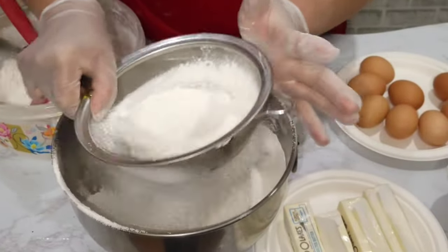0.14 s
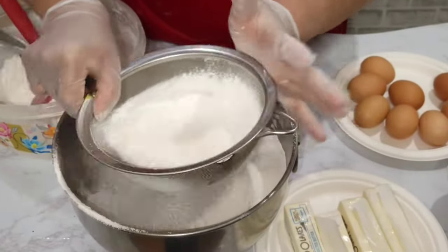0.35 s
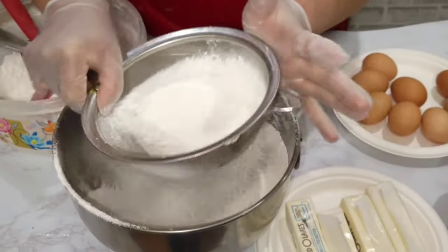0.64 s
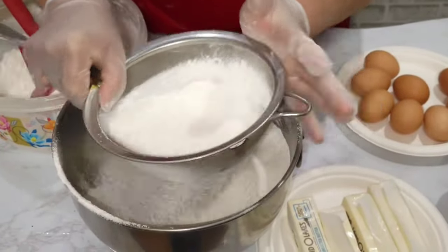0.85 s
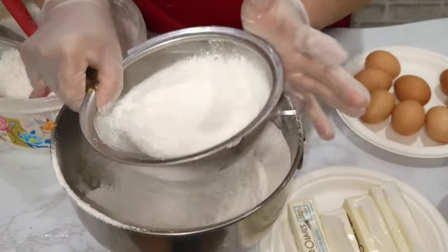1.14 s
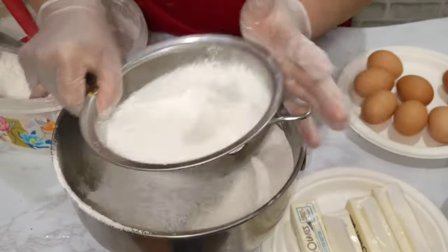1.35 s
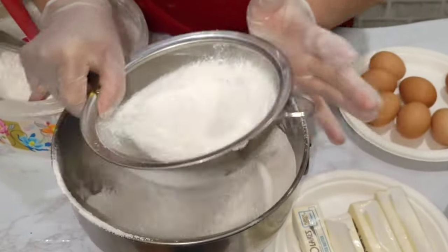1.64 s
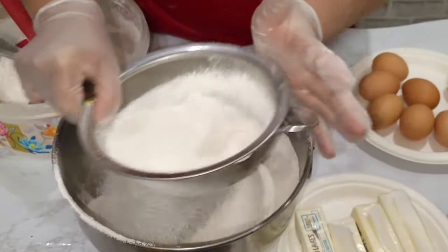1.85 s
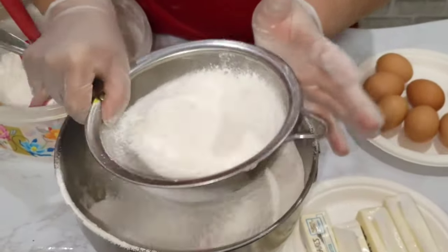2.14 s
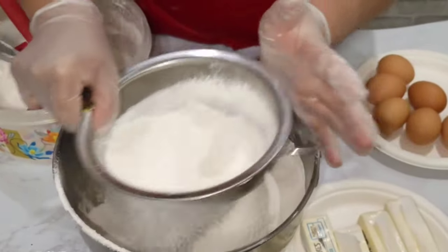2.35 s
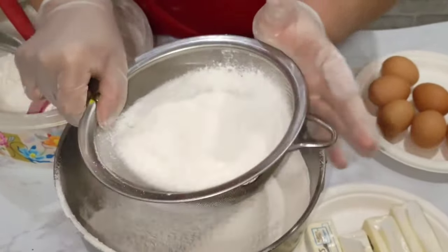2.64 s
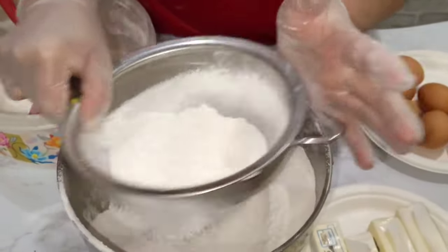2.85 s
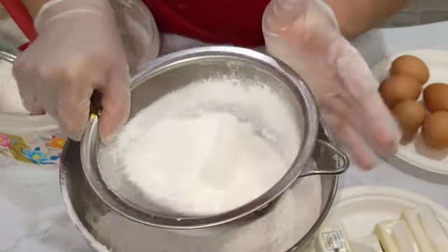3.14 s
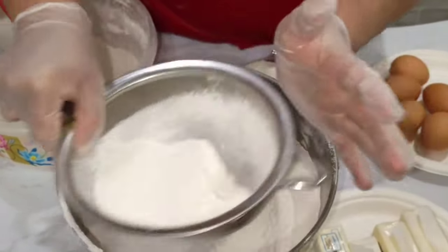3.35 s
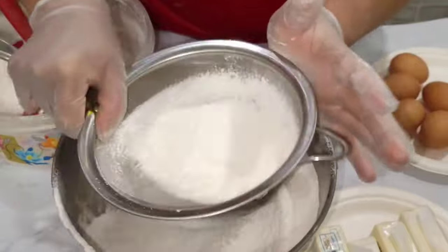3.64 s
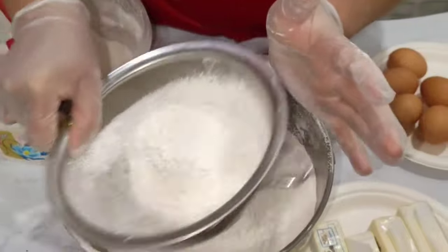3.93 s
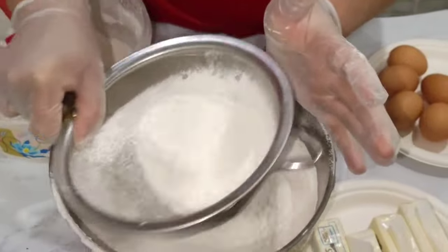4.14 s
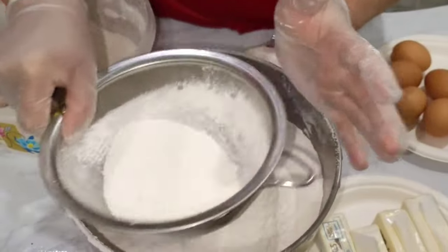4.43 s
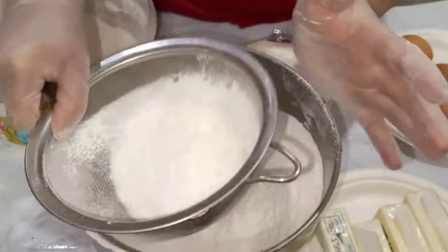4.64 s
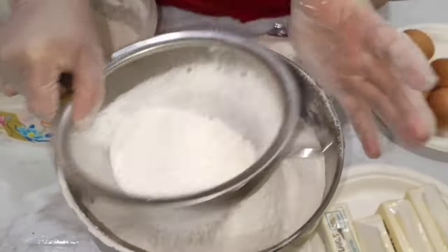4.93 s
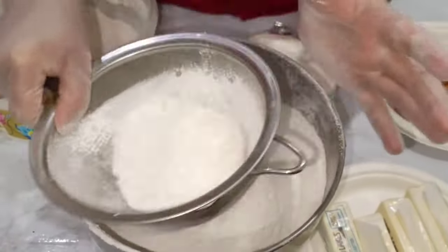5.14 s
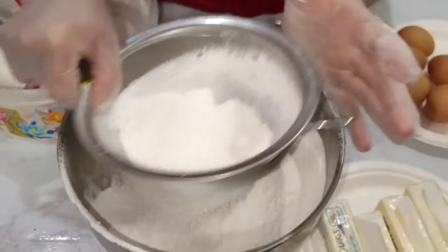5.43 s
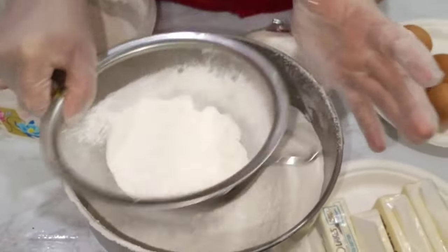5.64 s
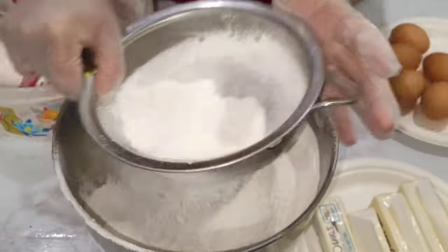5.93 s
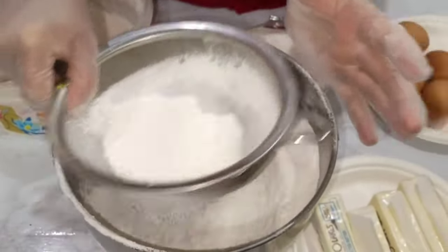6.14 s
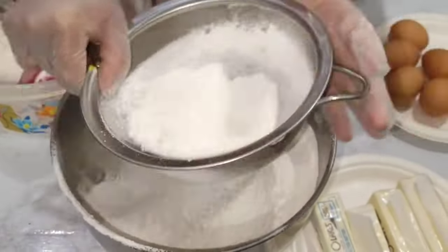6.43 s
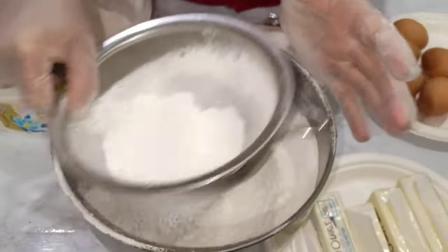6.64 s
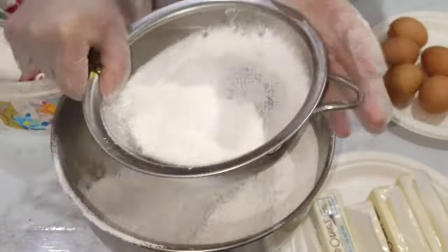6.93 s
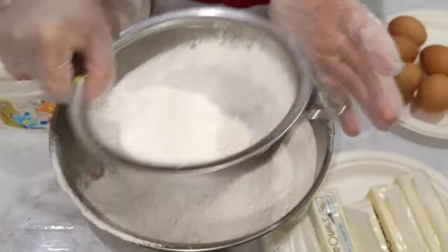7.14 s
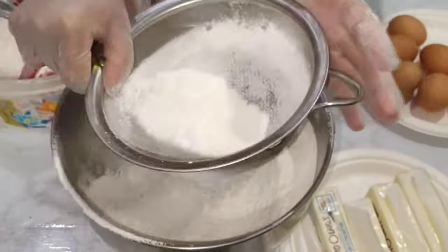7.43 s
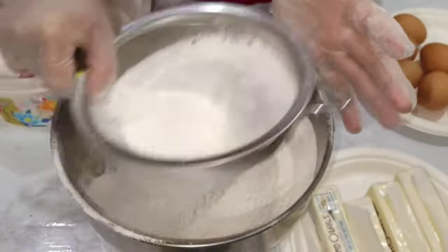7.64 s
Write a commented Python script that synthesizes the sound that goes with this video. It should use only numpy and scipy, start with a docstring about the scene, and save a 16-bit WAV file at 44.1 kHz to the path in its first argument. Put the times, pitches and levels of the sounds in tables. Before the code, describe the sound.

Close up in a small kitchen, a palm pats the rim of a wire sieve about four times a second. Each pat is a short dry mesh rattle with a faint dull thud, then a puff of hissing flour. From about four to six seconds the frame also strikes a steel bowl, with loud bright clinks ringing briefly. Then only the tapping continues, over faint low room rumble.

```python
"""Tapping a flour sieve over a steel bowl

A wire sieve of flour is tapped with the flat of a hand, about four times a second, in a kitchen.
Each tap is a burst of coloured noise for the rattling rim, plus damped modes and dull noise for the frame.
Swelling hiss is the flour hopping, landing and sliding on the mesh; small pitched knocks come from the grip.
For a while the sieve sinks so low that it clinks on the bowl: detuned steel modes, shimmer, buzz and crack.
The table bumps in slow low swells; rumble, air and a short noise tail make the room."""
import sys
import numpy as np
from scipy import signal
from scipy.fft import rfft, irfft, next_fast_len
from scipy.io import wavfile

SR = 44100
rng = np.random.default_rng(int(sys.argv[2]) if len(sys.argv) > 2 else 0)


def wav_record(signal):
    """Record a signal, one row per channel, as 16-bit PCM in the file named by sys.argv[1]."""
    frames = np.transpose(np.atleast_2d(signal))
    bounded = np.clip(frames, -1, 1)
    # unit amplitude maps onto the largest positive 16-bit level
    quanta = np.round(bounded * 32767).astype(np.int16)
    wavfile.write(sys.argv[1], SR, quanta)


N = 343098
CLOCK = np.arange(N) / SR   # time in the scene, s
AGE = np.arange(SR * 2 // 5) / SR   # time within one short sound (0.4 s), s

# Names ending in _t60 are times to fall by 60 dB, in s.
# Spectra are relative: the layers they colour are levelled afterwards.


def from_db(db):
    """Decibels to gain."""
    return 10 ** (np.asarray(db) / 20)


def at_hz(points, hz):
    """Read a table on a log-frequency axis."""
    f, value = np.transpose(points)
    return np.interp(np.log(np.maximum(hz, 1)), np.log(f), value)


def in_time(rows):
    """Draw a straight-line curve through the rows, one value per sample."""
    return np.interp(CLOCK, *np.transpose(rows))


def rms_one(x):
    """Scale to rms 1."""
    return x / np.sqrt(np.mean(x ** 2) + 1e-20)


def at_level(x, db):
    """Give a short sound the energy of 10 ms at this level."""
    return from_db(db) * rms_one(x) * np.sqrt(0.01 * SR / x.shape[-1])


def fade(t60):
    """Free exponential decay, 60 dB in t60."""
    return np.exp(-np.log(1000) * AGE / t60)


def swell(centre_s, width_s):
    """A bell-shaped rise and fall."""
    return np.exp(-0.5 * ((AGE - centre_s) / width_s) ** 2)


def ping(hz, t60):
    """One damped mode: a dying sine."""
    return np.sin(2 * np.pi * hz * AGE) * fade(t60)


def add(out, start_s, x):
    """Mix a short sound in at its start time, trimmed to the scene."""
    i = round(start_s * SR)
    first, last = max(i, 0), min(i + x.shape[-1], N)
    out[:, first:last] += x[..., first - i:last - i]


def colour(x, spectrum):
    """Causal (minimum-phase) filter with the given spectrum."""
    size = 2 * next_fast_len(x.shape[-1] // 2 + 1024)
    gain = from_db(at_hz(spectrum, np.fft.rfftfreq(size, 1 / SR)))
    # folding the cepstrum onto positive time makes the filter minimum-phase
    cepstrum = irfft(np.log(gain))
    cepstrum[1:size // 2] *= 2
    cepstrum[size // 2 + 1:] = 0
    response = np.exp(rfft(cepstrum))
    return irfft(rfft(x, size) * response)[..., :x.shape[-1]]


# stereo width of noise and bowl modes: f/Hz, side-to-mid level/dB
STEREO_WIDTH = [(60, -5.5), (110, -12), (200, -9), (380, -3), (700, -0.5), (1290, 1.5), (2380, -1.5),
                (4400, -0.5), (8120, -9.5), (15000, -8.5)]


def stereo_noise(size, width_db=0., grain_db=0.):
    """White noise, wide in the middle range; grain_db makes it a crowd of unequal clicks."""
    grains = from_db(grain_db * np.minimum(rng.exponential(1, size), 4))
    mid, side = rng.standard_normal((2, size)) * grains
    side = from_db(width_db) * colour(side, STEREO_WIDTH)
    return np.array([mid + side, mid - side])


def dying_noise(t60s, width_db):
    """Countless modes struck at once: each band dies at its own rate."""
    spectrum = rfft(stereo_noise(len(AGE), width_db))
    hz = np.fft.rfftfreq(len(AGE), 1 / SR)
    centres, times = np.transpose(t60s)
    shares = [at_hz(np.c_[centres, one], hz) for one in np.eye(len(centres))]   # overlapping bands
    return sum(irfft(spectrum * share, len(AGE)) * fade(t60) for share, t60 in zip(shares, times))


# low room rumble: f/Hz, level/dB per Hz
RUMBLE_SPECTRUM = [(20, -27), (40, -19), (56, 5), (75, -2), (110, -10.5), (200, -10.5), (400, -43)]
# air of the room: f/Hz, level/dB per Hz
AIR_SPECTRUM = [(20, -20), (100, -0.5), (200, 3.5), (450, -3.5), (900, -12), (1900, -13.5), (2500, -20),
                (3500, -14.5), (6500, -19), (10500, -16), (13000, -24), (16000, -16)]
# rustle of flour in the moving sieve, before the overall lift: t/s, level/dB
RUSTLE_LEVEL = [(0.0, -61.5), (0.54, -65), (0.65, -54), (1.47, -67), (3.12, -55), (3.75, -62),
                (3.99, -58.5), (4.4, -50), (4.83, -58), (5.72, -57.5), (6.24, -58), (7.78, -58)]
# sliding flour, for the rustle and the ticks of the grip: f/Hz, level/dB per Hz
SLIDING_SPECTRUM = [(300, -2), (750, 1), (1800, -1), (2450, -8.5), (3400, -4.5), (4900, -13.5), (6400, -10),
                    (9000, -20), (11300, -32), (13000, -9), (16000, -23)]


def background(rumble_db=-59.0, rustle_db=2.0, air_db=-57.0):
    """Steady noise for the room's rumble and air; grainy noise with a moving level for rustling flour."""
    rumble = from_db(rumble_db) * rms_one(colour(stereo_noise(N, width_db=2.5), RUMBLE_SPECTRUM))
    grains = stereo_noise(N, grain_db=5.0)
    rustle = from_db(in_time(RUSTLE_LEVEL) + rustle_db) * rms_one(colour(grains, SLIDING_SPECTRUM))
    air = from_db(air_db) * rms_one(colour(stereo_noise(N, width_db=3.5), AIR_SPECTRUM))
    return rumble + rustle + air


# decay of the kitchen: f/Hz, t60/s
ROOM_DECAY = [(100, 0.33), (500, 0.17), (2000, 0.15), (7000, 0.12), (15000, 0.12)]


def kitchen(x, gap_s=0.0043):
    """Reflections from bowl, worktop and walls, merging into a short tail."""
    tail = dying_noise(ROOM_DECAY, width_db=0.5)
    tail *= np.clip(AGE / gap_s - 1, 0, 1)   # silent for one gap, full after two
    tail /= np.sqrt(np.sum(tail ** 2) / 2)
    return signal.fftconvolve(x, tail, axes=1)[:, :N]


# the bowl bumps on the table: t/s of the peak, push level/dB before the two layers are weighted
TABLE_BUMPS = [(2.12, -39), (4.166, -30), (4.349, -36.5), (4.473, -38), (4.633, -39), (4.924, -40.5),
               (5.093, -37.5), (7.744, -37)]
# the table's dull thump: f/Hz, level/dB per Hz
THUMP_SPECTRUM = [(25, -9.5), (50, -2.5), (75, 6), (105, -14), (170, -12), (400, -36.5)]
BUMP_S = 0.025   # how slowly a bump swells
# a tap nudges the table later: push level at a usual thud, share of the thud's swing in dB
NUDGE_LAG_S, NUDGE_DB, NUDGE_FOLLOWS = 0.11, -56, 0.46
USUAL_TAP_DB, USUAL_THUD_DB, USUAL_CLINK_DB = -30, -45, -15   # reference strengths for every layer


def table(boom_hz=54.4, boom_db=-3.5, dull_db=-2.5):
    """Soft bumps of the bowl, and a nudge from every tap, swell and fade in the table top's lowest mode."""
    push = np.zeros((1, N))
    nudges = [(s + NUDGE_LAG_S, NUDGE_DB + NUDGE_FOLLOWS * (frame_db - USUAL_THUD_DB))
              for s, _, _, frame_db in TAP_STROKES]
    for s, db in TABLE_BUMPS + nudges:
        add(push, s - 2 * BUMP_S, at_level(swell(2 * BUMP_S, BUMP_S), db))
    boom = from_db(boom_db) * rms_one(np.sin(2 * np.pi * boom_hz * CLOCK))
    dull = from_db(dull_db) * rms_one(colour(stereo_noise(N, width_db=-5.0), THUMP_SPECTRUM))
    return push * (boom + dull)


# small knocks of the handle in the grip: t/s, level/dB before the overall lift, f/Hz
GRIP_KNOCKS = [(0.487, -44.5, 1120), (1.816, -47.5, 1400), (2.131, -38.5, 744), (2.424, -47.5, 970),
               (2.613, -52, 1570), (2.863, -46, 1470), (7.396, -49, 1630)]


def knocks(knock_db=1.0, knock_t60=0.022, tick_db=-49.5, tick_t60=0.034, slip_t60=0.013):
    """The handle slips in the grip: a noise burst excites one damped mode, with a tick on top."""
    out = np.zeros((2, N))
    for s, db, hz in GRIP_KNOCKS:
        tick = colour(stereo_noise(len(AGE)) * fade(tick_t60), SLIDING_SPECTRUM)
        slip = stereo_noise(len(AGE)) * fade(slip_t60)
        knock = signal.fftconvolve(slip, ping(hz, knock_t60)[None], axes=1)[:, :len(AGE)]
        add(out, s, at_level(knock, db + knock_db) + at_level(tick, tick_db))
    return out


def grazes(graze_s=0.0078, graze_db=-24., shake_db=-39.5, shake_t60=0.1, shake_lag_s=0.00397,
           shake_follows=0.16):
    """The mesh grazes the bowl around each rim strike, and the blow shakes the sieve's frame."""
    out = np.zeros((2, N))
    early_s = 0.04   # room for the graze to build up before the strike
    for s, ring_db in BOWL_CLINKS:
        brush = stereo_noise(len(AGE), grain_db=2.0) * np.exp(-np.abs(AGE - early_s) / graze_s)
        graze = colour(brush, RATTLE_SPECTRUM)
        add(out, s - early_s, at_level(graze, ring_db + graze_db))
        shake = colour(stereo_noise(len(AGE)) * fade(shake_t60), THUD_SPECTRUM)
        add(out, s + shake_lag_s, at_level(shake, shake_db + shake_follows * (ring_db - USUAL_CLINK_DB)))
    return out


# sieve against the bowl: t/s, ring strength level/dB, from which each layer takes its level
BOWL_CLINKS = [(4.105, -32.5), (4.237, -12.5), (4.375, -32.5), (4.454, -33), (4.4913, -8.5),
               (4.7507, -13.5), (5.063, -19), (5.086, -25.5), (5.342, -17), (5.615, -16.5), (5.8888, -22.5),
               (6.167, -37.5)]
# strongest modes of the bowl: f/Hz, relative level/dB
BOWL_MODES = [(683.7, -56), (1340, -60), (1642, -61), (1863, -59), (2266, -66), (3327, -56), (4366, -59),
              (4533, -45), (4716, -52), (4829, -51), (4930, -54), (5249, -55), (5674, -59), (5809, -57),
              (6158, -57), (6352, -44), (6621, -49), (6675, -49), (6896, -49), (7208, -51), (7343, -46),
              (7671, -46), (7768, -49), (8134, -50), (8651, -58), (8963, -62), (10148, -67), (12548, -55),
              (12877, -57)]
# the bowl's crowd of weaker modes: f/Hz, t60/s
BOWL_DECAY = [(300, 0.22), (1000, 0.18), (3300, 0.27), (4600, 0.34), (7000, 0.18), (10000, 0.35),
              (15000, 0.041)]
# shimmer of the weaker modes, and the rim's buzz: f/Hz, level/dB per Hz
SHIMMER_SPECTRUM = [(2500, -26), (3300, -6), (3800, -16), (4300, -9), (4650, 0), (5100, -13.5), (5900, -11),
                    (6450, 4), (7700, -0.5), (8600, -7.5), (10000, -34), (15000, -25.5)]
# low clank of the struck bowl: f/Hz, level/dB per Hz
CLANK_SPECTRUM = [(150, -12), (450, -7), (680, 4.5), (1100, 5), (1600, -6), (2000, -4), (2400, -29),
                  (3500, -17.5)]
# bright crack of steel on steel: f/Hz, level/dB per Hz
CRACK_SPECTRUM = [(3000, -11), (7000, -5), (9000, -0.5), (11000, -3), (12800, 8.5), (14500, 6),
                  (16000, -4.5)]
# soft clinks are mostly clank, hard ones crack: level at a usual clink, dB gained per dB of ring
CLANK_DB, CLANK_FOLLOWS = -26.5, 0.63
CRACK_DB, CRACK_FOLLOWS = -23.5, 1.12
# a hard blow rebounds and lets the modes sing: dB they gain on the rest, per dB of ring
RING_FOLLOWS = 0.21


def clinks(mode_t60=0.19, mode_db=-2.5, shimmer_db=-3.5, buzz_db=-4.0, crack_t60=0.066, rim_db=3.0,
           buzz_t60=0.053, tilt_db=1.0):
    """Steel on steel: a crack, a short buzz of rim on bowl, and the bowl's ring of damped modes."""
    out = np.zeros((2, N))
    hz, level = np.transpose(BOWL_MODES)
    # the modes below 4.5 kHz sit a little lower; the rim mode near 4.5 kHz sings out above the rest
    level = level + tilt_db * np.log2(np.minimum(hz / 4500, 1)) + rim_db * (np.abs(hz - 4535) < 60)
    dying = fade(mode_t60 * (hz[:, None] / 6000) ** -0.3)   # mode_t60 holds at 6 kHz
    # every mode reaches the two microphones with a phase of its own
    turn = (-1) ** np.arange(len(hz)) * np.arctan(from_db(at_hz(STEREO_WIDTH, hz)))
    apart = np.exp(1j * np.outer([1, -1], turn))
    for s, ring_db in BOWL_CLINKS:
        force_db = ring_db - USUAL_CLINK_DB
        # the point of contact decides how strongly each mode is struck, and detunes it a little
        phase = np.exp(2j * np.pi * rng.random(len(hz)))
        strength = from_db(level + 2.5 * rng.standard_normal(len(hz))) * phase
        pitch = hz + 7 * rng.standard_normal(len(hz))
        modes = np.exp(2j * np.pi * pitch[:, None] * AGE) * dying
        ring = at_level(((apart * strength) @ modes).imag, ring_db + mode_db + RING_FOLLOWS * force_db)

        crowd = colour(dying_noise(BOWL_DECAY, width_db=1.5), SHIMMER_SPECTRUM)
        shimmer = at_level(crowd, ring_db + shimmer_db)
        chatter = stereo_noise(len(AGE), width_db=2., grain_db=4.0) * fade(buzz_t60)
        buzz = at_level(colour(chatter, SHIMMER_SPECTRUM), ring_db + buzz_db)

        low = colour(dying_noise(BOWL_DECAY, width_db=-3.5), CLANK_SPECTRUM)
        clank = at_level(low, CLANK_DB + CLANK_FOLLOWS * force_db)
        high = colour(stereo_noise(len(AGE)) * fade(crack_t60), CRACK_SPECTRUM)
        crack = at_level(high, CRACK_DB + CRACK_FOLLOWS * force_db)
        onset = 1 - fade(0.0039)   # rounds the attack over a few ms
        add(out, s, (ring + shimmer + buzz + clank + crack) * onset)
    return out


def landing(flight_s, db, spread_s=0.01, lift_share=0.61, trickle_share=0.15, trickle_s=0.026):
    """Loudness of one hop: flour leaves the mesh softly, lands on it, and the last trickles after."""
    lift = lift_share * swell(flight_s / 2, flight_s / 2)
    trickle = trickle_share * swell(flight_s + trickle_s, trickle_s)
    return at_level(swell(flight_s, spread_s) + lift + trickle, db)


# flour landing on the mesh: f/Hz, level/dB per Hz
LANDING_SPECTRUM = [(1500, -24.5), (3300, -7), (5000, -6.5), (6400, -2.5), (8200, -1), (9300, -5.5),
                    (11300, -7), (13000, 0.5), (16000, -2.5)]
# flour gliding over the mesh: f/Hz, level/dB per Hz
GLIDING_SPECTRUM = [(300, -2.5), (750, 3.5), (1800, 0.5), (2450, -8), (3400, -2), (4900, -10.5), (6400, -3),
                    (11300, -14), (13000, -3.5), (16000, -11.5)]
LANDING_DB, LANDING_FOLLOWS = -37, 0.18   # the hop at a usual tap, its share of the tap's swing in dB
USUAL_PUSH_S, HOP_DB_PER_DOUBLING = 0.005, 1.1   # a longer push of the palm throws more flour
# as the heap thins, it hops less high and slides more freely
FLIGHT_S, FLIGHT_LOSS_PER_S = 0.058, 0.015
SLIDE_DB, SLIDE_GAIN_DB_PER_S = -52, 1.37


def flour(slide_lead_s=.043, slide_spread_s=0.023, toss_s=0.165, toss_db=-34.0):
    """Flour slides as the sieve swings to the hand, hops hissing at the tap; a bowl blow tosses it higher."""
    hops, slides = np.zeros((2, 1, N))
    swing = swell(3 * slide_spread_s, slide_spread_s)
    for s, push_s, tap_db, _ in TAP_STROKES:
        hop_db = LANDING_DB + LANDING_FOLLOWS * (tap_db - USUAL_TAP_DB)
        hop_db += HOP_DB_PER_DOUBLING * np.log2(push_s / USUAL_PUSH_S)
        add(hops, s, landing(FLIGHT_S * np.exp(-FLIGHT_LOSS_PER_S * s), hop_db))
        slide = at_level(swing, SLIDE_DB + SLIDE_GAIN_DB_PER_S * s)
        add(slides, s - slide_lead_s - 3 * slide_spread_s, slide)   # peaks just before the tap
    for s, ring_db in BOWL_CLINKS:
        add(hops, s, landing(toss_s, ring_db + toss_db))
    hiss = rms_one(colour(stereo_noise(N, grain_db=5.), LANDING_SPECTRUM))
    glide = rms_one(colour(stereo_noise(N, width_db=-2.0, grain_db=2.5), GLIDING_SPECTRUM))
    return hops * hiss + slides * glide


# hand on the rim: t/s, rattle length/s, rattle level/dB, frame thud level/dB
TAP_STROKES = [(-0.03, .005, -53, -28), (0.2192, 0.0027, -39, -44), (0.4612, 0.011, -32, -51),
               (0.715, 0.0022, -30.5, -40.5), (0.9698, 0.0052, -31.5, -42.5), (1.226, 0.0082, -34.5, -42.5),
               (1.4777, .0016, -28.5, -41), (1.7285, .0044, -32, -46), (1.9842, 0.005, -31.5, -44.5),
               (2.234, 0.0058, -30, -59), (2.4889, 0.0041, -27.5, -44.5), (2.752, 0.007, -33.5, -49),
               (2.9942, .0087, -30, -47.5), (3.249, 0.012, -33.5, -66), (3.5035, 0.0081, -31, -48.5),
               (3.7325, 0.01, -32, -53), (3.9672, 0.0036, -33, -54), (4.1873, 0.011, -33, -58),
               (4.5994, 0.013, -30, -49), (4.841, 0.011, -32, -45), (5.329, 0.012, -28.5, -50),
               (5.5698, 0.0071, -28.5, -54), (5.8108, .009, -28.5, -46.5), (6.055, 0.0044, -33.5, -55.5),
               (6.2998, 0.0027, -29.5, -45), (6.541, 0.0045, -33.5, -58), (6.8067, 0.0032, -29.5, -47.5),
               (7.0422, .0036, -28.5, -46.5), (7.2764, 0.007, -32, -52.5), (7.531, 0.0076, -33.5, -47.5),
               (7.6944, 0.0036, -41, -54)]
# mesh chattering in the rim, before the treble lift: f/Hz, level/dB per Hz
RATTLE_SPECTRUM = [(150, 6), (500, -9.5), (1000, 1.5), (1900, -1.5), (2450, -12), (3200, 5), (4100, 2),
                   (4900, -4), (6300, 5), (7400, -3.5), (8300, 1), (11300, -12), (13000, -3.5),
                   (16000, -13)]
# dull thud of hand and frame: f/Hz, level/dB per Hz
THUD_SPECTRUM = [(100, -25.5), (300, 4), (420, -10), (600, 4), (1000, -6.5), (1300, -12.5), (1900, -5),
                 (2600, -21.5)]
BRIGHT_DB = 3   # lift of the rattle per octave, within an octave of 6.5 kHz
# the grip damps the handle: its thud at a usual tap, its share of the frame's swing in dB
HANDLE_DB, HANDLE_FOLLOWS = -46, 0.45


def taps(snap_db=17.5, lead_s=.0006, touch_s=0.0029, touch_db=-13.5, rattle_t60=0.019,
         thud_lag_s=0.000985, thud_t60=0.097, rattle_db=0.0, thud_db=4.5, mode_db=0.0, mode_t60=0.048):
    """The palm meets the rim, the mesh chatters in it for a few ms; the hand-damped handle and frame thud."""
    rattles, thuds = np.zeros((2, 2, N))
    early_s = 0.03   # room for the palm's pressure to build up
    since = AGE - early_s
    tone = [(hz, level + BRIGHT_DB * np.clip(np.log2(hz / 6500), -1, 1)) for hz, level in RATTLE_SPECTRUM]
    for s, length_s, tap_db, frame_db in TAP_STROKES:
        # the soft palm builds up pressure first; contacts go on while it pushes, then die at once
        touch = from_db(touch_db) * np.exp(-np.abs(since) / touch_s)
        push = np.exp(-np.log(1000) * np.maximum(since - 0.68 * length_s, 0) / rattle_t60)
        contact = np.where(since < 0, touch, push)
        chatter = stereo_noise(len(AGE), width_db=-2.0, grain_db=1.) * contact
        # one hard snap as the mesh seats in the rim; it stands out most in the shortest taps
        chatter[:, round((early_s + lead_s + length_s / 4) * SR)] += from_db(snap_db)
        add(rattles, s - lead_s - early_s, at_level(colour(chatter, tone), tap_db + rattle_db))

        # the grip changes from tap to tap, and with it the pitch of the thud
        handle_hz, frame_hz = np.array([310, 570]) * (1 + 0.07 * rng.standard_normal(2))
        handle_db = HANDLE_DB + HANDLE_FOLLOWS * (frame_db - USUAL_THUD_DB)
        handle = at_level(ping(handle_hz, mode_t60), handle_db + mode_db)
        frame = at_level(ping(frame_hz, mode_t60), frame_db + mode_db)
        flesh = colour(stereo_noise(len(AGE), width_db=-5.5) * fade(thud_t60), THUD_SPECTRUM)
        flesh = at_level(flesh, np.maximum(handle_db, frame_db) + thud_db)
        add(thuds, s + thud_lag_s, handle - frame + flesh)   # the two modes start in opposite phase
    return rattles, thuds


def scene(sieve_pan_db=0.63, bowl_pan_db=-0.5):
    """All sounds at the bowl, each with its share of the room; positive pan leans left."""
    left_right = np.array([[1], [-1]])
    rattle, thud = np.array(taps()) * from_db(sieve_pan_db * left_right)
    powder, knock = flour(), knocks()
    bowl = (clinks() + grazes()) * from_db(bowl_pan_db * left_right)
    into_room = from_db(-7.0) * rattle + from_db(-3.5) * thud + from_db(-6.5) * powder
    into_room += from_db(-6.0) * knock + from_db(-15.0) * bowl
    direct = rattle + thud + powder + knock + bowl
    return direct + kitchen(into_room) + table() + background()


def record(dry):
    """The microphone loses the deepest bass, the loudest peaks overload, and the top is cut."""
    low_cut = signal.butter(3, 36, "high", fs=SR, output="sos")
    thin = signal.sosfilt(low_cut, dry)
    clipped = np.clip(thin, -0.85, 0.85)
    top_cut = signal.ellip(12, 0.1, 90, 15900, fs=SR, output="sos")   # steep low-pass at 15.9 kHz
    return signal.sosfilt(top_cut, clipped)


dry = scene()
out = record(dry)
wav_record(out)
```